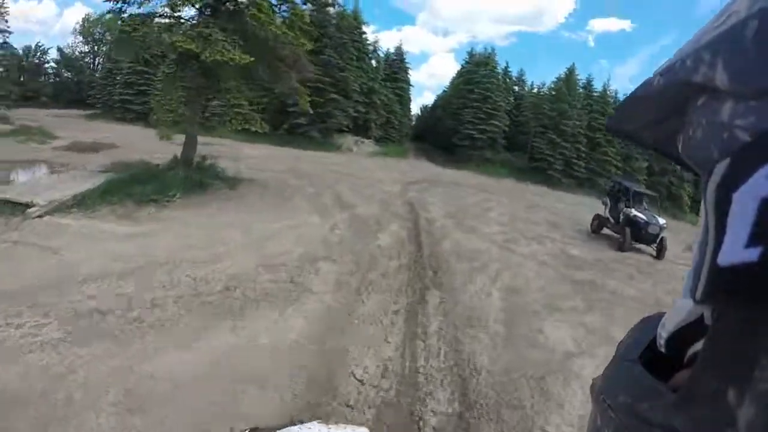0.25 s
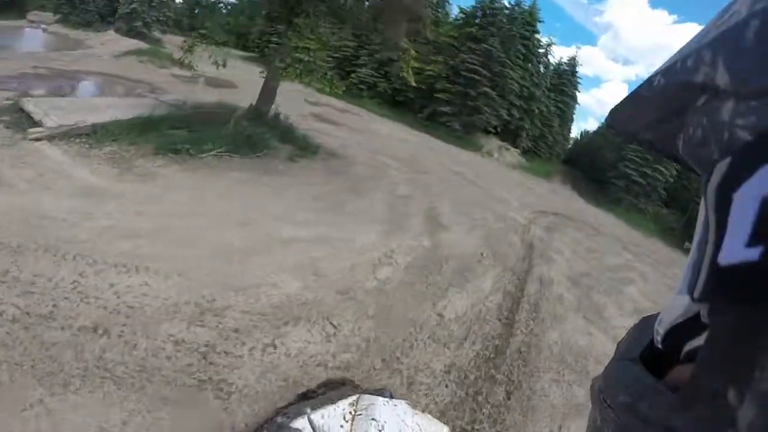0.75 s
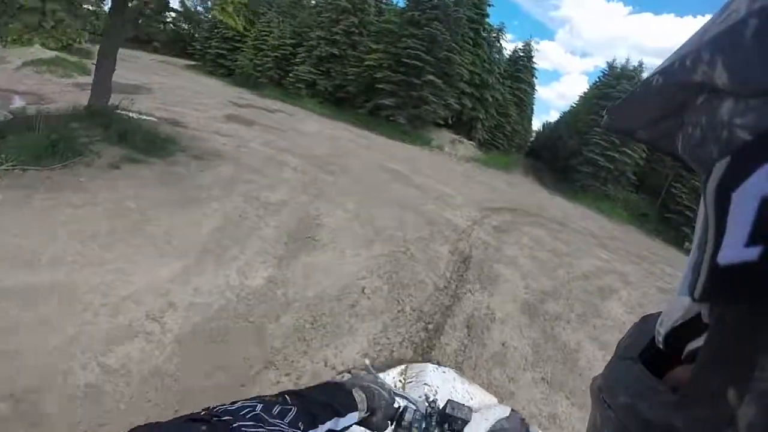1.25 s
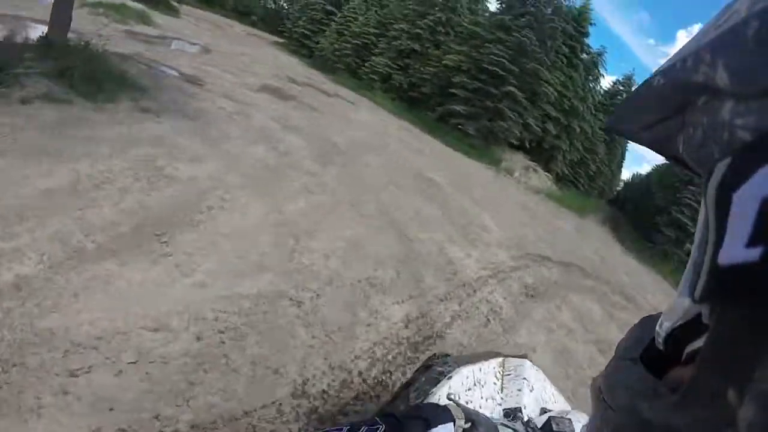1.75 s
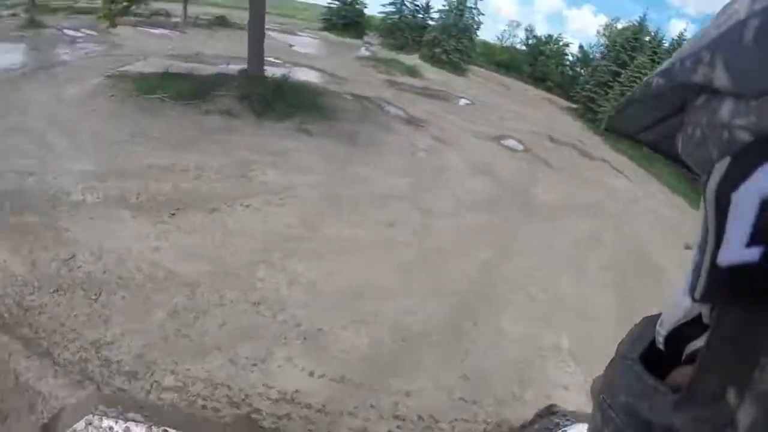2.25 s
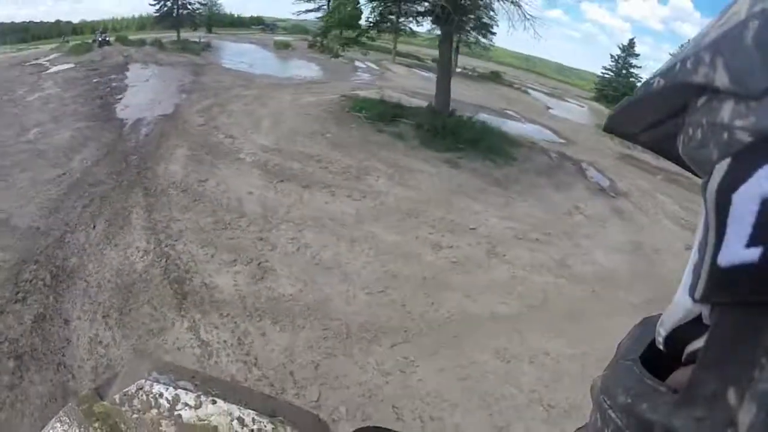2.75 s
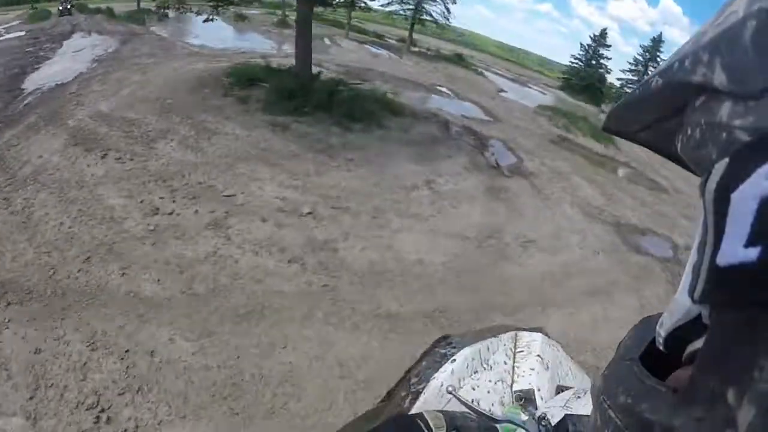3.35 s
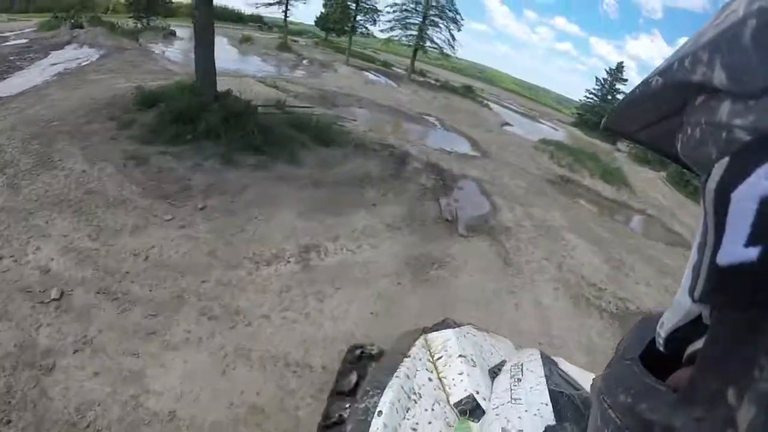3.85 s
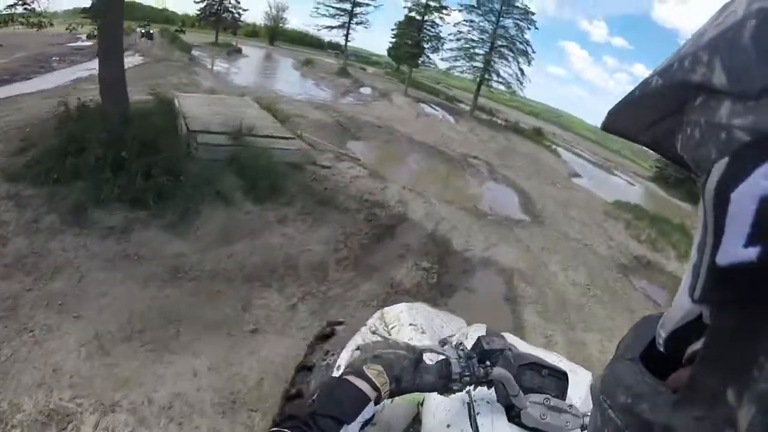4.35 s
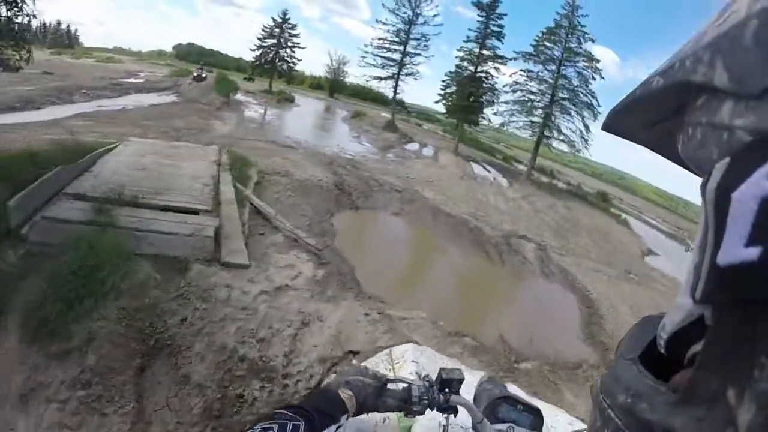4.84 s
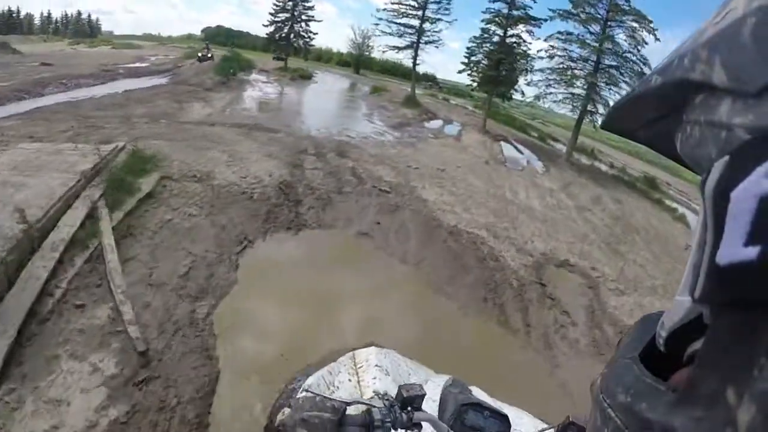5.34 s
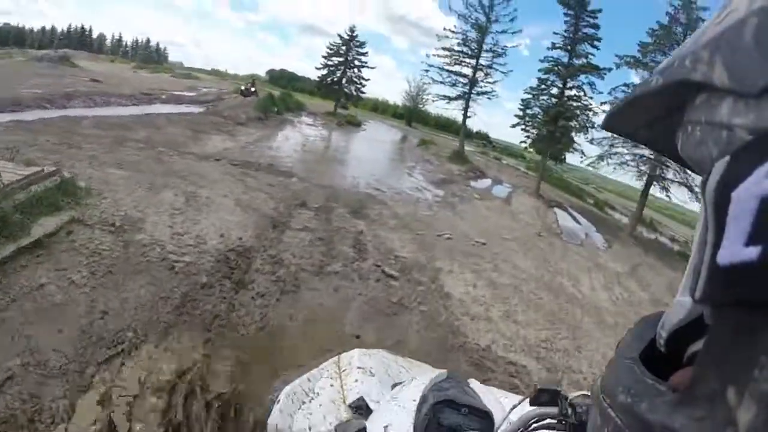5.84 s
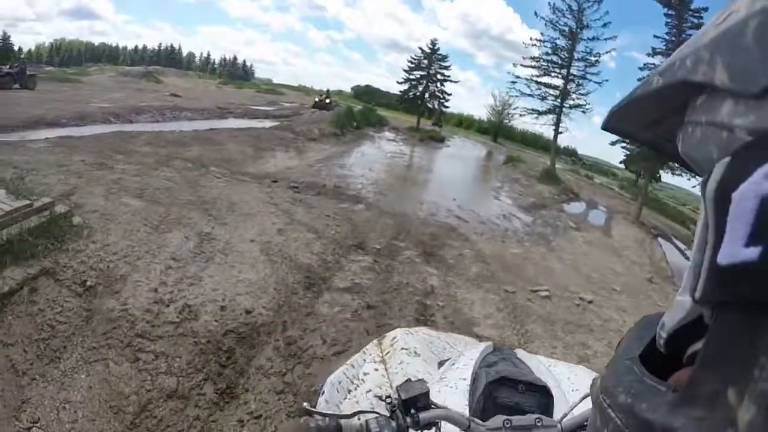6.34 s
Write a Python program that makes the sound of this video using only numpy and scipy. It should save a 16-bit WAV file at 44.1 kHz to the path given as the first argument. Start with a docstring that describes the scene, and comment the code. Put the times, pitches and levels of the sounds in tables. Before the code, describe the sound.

Outdoors on a dirt track, a microphone at the rider's helmet hears a single-cylinder four-stroke quad bike up close. It begins with a throaty, pulsing shut-throttle drone, mechanical clatter and soft hiss, slowing slightly. From about 0.8 to 1.6 seconds moderate blips roughen it, with thin gear whine. A brief sharp bark comes at 2.1, a small bright stone clink on metal at about 2.4, and stronger raspy bursts from 2.6 to 3.3. The longest pull, 3.4 to 3.9, climbs to the highest pitch with a ringing pipe, followed by a short blip near 4.1. From 4.3 to 5.6 braking shakes a loose panel in dense, hard rattles while the engine winds down. It chugs low and stumbles around 5.8 to 6.2, then blips at 6.3 and again at the end. Low wind buffets in lumps, strongest near 4.9 and 5.9.

```python
"""On a dirt track, a four-stroke quad bike is ridden with short throttle blips, heard at the rider's helmet.
Two blows per engine cycle ring silencer and pipe; under load they sharpen into a bark with a rasp of gas.
Crank-locked tones, gear whine and the filtered noise of engine clatter and hiss ride on the exhaust.
Random hits ring a loose panel under braking, a stone clinks on metal (decaying sines), and wind buffets
the microphone (lumpy low noise)."""
import sys
import numpy as np
from scipy import signal
from scipy.fft import rfft, irfft, next_fast_len
from scipy.io import wavfile
from scipy.ndimage import uniform_filter1d, map_coordinates

SR = 44100
rng = np.random.default_rng(int(sys.argv[2]) if len(sys.argv) > 2 else 0)


def waveform_to_disk(signal):
    """Save audio, clipped to [-1, 1], as 16-bit WAV at the path in sys.argv[1]."""
    frames = np.transpose(np.atleast_2d(signal))
    scaled = np.clip(frames, -1, 1) * 32767
    samples = np.round(scaled).astype(np.int16)
    wavfile.write(sys.argv[1], SR, samples)


N = 290619
TIME = np.arange(N) / SR

# engine cycle rate, one cycle = two crank turns: t/s, f/Hz
CYCLE_RATE = [(0.0, 41.87), (0.18, 38.89), (0.38, 37.38), (0.77, 35.9), (0.94, 38.29), (1.1, 39.26),
              (1.28, 42.11), (1.67, 41.42), (1.91, 38.17), (2.03, 37.48), (2.18, 39.19), (2.64, 36.95),
              (2.89, 44.4), (2.95, 44.61), (3.06, 41.44), (3.19, 41.4), (3.34, 45.93), (3.47, 45.08),
              (3.56, 46.82), (3.8, 55.21), (3.89, 55.8), (3.98, 49.61), (4.07, 48.37), (4.23, 50.0),
              (4.31, 48.48), (4.4, 42.93), (4.57, 37.2), (4.67, 35.5), (5.16, 32.5), (5.53, 28.1),
              (5.89, 27.2), (6.04, 31.13), (6.15, 27.84), (6.22, 28.53), (6.38, 35.75), (6.5, 32.94),
              (6.59, 36.79)]
# drone, throttle shut: t/s, boom level/dB, neck level/dB, order 3 level/dB, order 4 level/dB, order 6 level/dB
SHUT_DRONE = [(0.0, -38.5, -47, -59, -35.5, -36.5), (.4, -40, -40, -62, -44, -29),
              (.68, -32.5, -36, -46, -50, -26.5), (.78, -26.5, -28.5, -52, -57, -27.5),
              (1.4, -26.5, -35.5, -48, -43, -30), (1.75, -26.5, -33.5, -44, -39.5, -26),
              (2.1, -24, -28.5, -64, -44.5, -25), (2.4, -30, -32, -58, -36, -24.5),
              (2.62, -26, -28.5, -43, -35, -24), (3.05, -23.5, -31, -51, -32.5, -33.5),
              (3.45, -24, -28.5, -62, -37, -32.5), (3.7, -25.5, -38, -45, -30, -27),
              (3.85, -37, -35, -58, -59, -23.5), (3.97, -27, -37.5, -52, -49, -52),
              (4.06, -29, -39.5, -30, -47, -34), (4.25, -26.5, -36.5, -38.5, -27.5, -31),
              (4.6, -32, -36, -34, -34, -30), (5.05, -39, -36.5, -33, -35, -26),
              (5.6, -34.5, -42, -35, -45, -30.5), (5.95, -26, -39.5, -42, -58, -33),
              (6.3, -29.5, -34.5, -31.5, -70, -24.5), (6.59, -28.5, -39, -51, -52, -20.5)]


def amp(db):
    """dB to gain."""
    return 10 ** (np.asarray(db) / 20)


def unit(x):
    """Scale to rms 1."""
    return x / np.sqrt(np.mean(x ** 2) + 1e-20)


def curves(rows):
    """One value per sample for each column after the time."""
    s, *cols = np.transpose(rows)
    return [np.interp(TIME, s, c) for c in cols]


def wobble(rate_hz):
    """Smooth random curve, rate_hz knots a second."""
    knots = rng.standard_normal(int(N * rate_hz / SR) + 4)
    return map_coordinates(knots, [TIME * rate_hz])


def filtered(x, response):
    """x through a complex response of frequency."""
    m = next_fast_len(N + SR // 2)
    spectrum = rfft(x, m) * response(np.fft.rfftfreq(m, 1 / SR))
    return irfft(spectrum, m)[:N]


def modes(table, sign=-1):
    """Causal resonances; sign -1 alternates them, +1 starts them together in a sharp front."""
    def response(f):
        return sum(sign ** k * amp(db) * 1j * f * width / (hz * hz - f * f + 1j * f * width)
                   for k, (hz, width, db) in enumerate(table))
    return response


def noise(points):
    """Noise of rms 1 with a (f/Hz, level/dB) spectrum."""
    hz, db = np.transpose(points)
    shape = lambda f: amp(np.interp(np.log(f + 1), np.log(hz + 1), db))
    return unit(filtered(rng.standard_normal(N), shape))


def steady(x, cycles):
    """Even the running rms to 1; the window is cycles long at 40 cycles/s."""
    power = uniform_filter1d(x ** 2, int(cycles * SR / 40))
    return x / np.sqrt(np.abs(power) + 1e-12)


def crank():
    """Crank position in engine cycles: the integral of the cycle rate."""
    start_cycles = .185
    return start_cycles + np.cumsum(curves(CYCLE_RATE)[0]) / SR


def throttle():
    """Opening 0-1: each blip is a rising ramp times a closing ramp; at each moment the most open blip rules."""
    # throttle blips: start t/s, open t/s, let go t/s, opening/0-1
    blips = [(0.777, .95, 0.92, 0.11), (1.057, 1.21, 1.29, 0.55), (1.2, 1.358, 1.6, 0.44),
             (2.098, 2.18, 2.08, 0.9), (2.622, 2.69, 2.7, 0.6), (2.69, 2.81, 2.88, .74),
             (3.103, 3.221, 3.33, 0.89), (3.413, 3.517, 3.85, 0.96), (4.0, 4.038, 4.23, 0.82),
             (6.232, 6.332, 6.39, 0.64), (6.52, 6.575, 6.8, 0.65)]
    close_s = 0.087
    openings = []
    for start, full, shut, top in blips:
        rise = np.clip((TIME - start) / abs(full - start), 0, 1)
        fall = np.clip(1 - (TIME - shut) / close_s, 0, 1)
        openings.append(top * rise * fall)
    return np.max(openings, axis=0)


def firing():
    """Gain that sags at each weak firing."""
    # weak firings: t/s, level/dB, half length/s
    stumbles = [(0.713, -12, 0.0068), (1.697, -6, 0.0078), (2.207, -14.5, 0.0067), (2.631, -8, 0.0085),
                (5.016, -18, 0.0078), (5.777, -6, 0.015), (5.904, -8.5, 0.051), (6.054, -13, 0.031),
                (6.162, -11.5, 0.031), (6.46, -4, 0.031), (6.547, -24, .012)]
    return amp(sum(db * np.exp(-((TIME - s) / half) ** 2) for s, db, half in stumbles))


def blows(angle, lag_cycles, scatter_db, jitter_s):
    """One impulse per cycle at a crank position, a little uneven in size and time."""
    draw = rng.standard_normal((400, 2))
    turn = np.arange(1, int(angle[-1] - lag_cycles) + 1)
    at_s = np.interp(turn + lag_cycles, angle, TIME) + jitter_s * draw[turn, 0]
    index = np.clip(at_s * SR, 0, N - 1).astype(int)
    return np.bincount(index, amp(scatter_db * draw[turn, 1]), N)


def exhaust(angle):
    """Both blows ring the silencer; under load their steep fronts, the pipe's ring and gas rasp come out."""
    # main chamber mode: f/Hz, width/Hz, level/dB
    silencer = [(219, 95, -3)]
    # upper chamber modes: f/Hz, width/Hz, level/dB
    upper_chamber = [(401.3, 69.5, 14), (505, 55, -1.5), (659, 34, 2.5)]
    # tailpipe modes: f/Hz, width/Hz, level/dB
    tailpipe = [(785, 15, -1), (1130, 120, -3.5), (1360, 60, 2), (1586, 57, 0), (1830, 69, -2),
                (2306, 62, 1.5), (2750, 34, -32)]
    second_lag_cycles = .363  # about 260 crank degrees
    first_share = 0.19  # first blow reaches the silencer weaker and cuts its ring short
    boom_gain_db, neck_gain_db = 7, 12  # rise at full throttle
    bark_db, bark_gain_db = -57, 38  # shut; rise at full throttle
    # pipe ring: base; with load it rises above a cycle rate, up to a most
    ring_base_db, ring_from_hz, ring_db_per_hz, ring_most_db = -49, 47.5, 9.5, 29.5

    load = throttle()
    boom_db, neck_db = curves(SHUT_DRONE)[:2]
    over_hz = curves(CYCLE_RATE)[0] - ring_from_hz
    ring_db = ring_base_db + load * np.clip(ring_db_per_hz * over_hz, 0, ring_most_db)

    # the pipe rounds the fronts
    soft = lambda f: 1 / (1 + 1.3j * f / 2850 - (f / 2850) ** 2) ** 2
    first = filtered(blows(angle, 0, .6, .00002), soft)
    second = filtered(blows(angle, second_lag_cycles, .6, .00004), soft)

    # two chambers in a row: the ring swells, then fades
    boom = filtered(-second - first_share * first, lambda f: modes(silencer)(f) ** 2)
    neck = filtered(-first - 1.2 * second, lambda f: modes(upper_chamber, sign=1)(f) / (1 + 1j * f / 900))

    fronts = first + 0.68 * second
    echoes = fronts.copy()
    echoes[200:] += .3 * fronts[:-200]  # reflection inside the pipe, 4.5 ms later
    # the pipe's mouth passes little above its resonance
    mouth = lambda f: 1 / (1 + .75j * f / 1330 - (f / 1330) ** 2)
    bark = filtered(-echoes, lambda f: (1j * f / (300 + 1j * f)) ** 2 * mouth(f))

    # gas keeps rushing after each front, 6 ms decay
    jet = signal.lfilter([1], [1, -np.exp(-1 / (.006 * SR))], fronts)
    rasp = filtered(.013 * jet * rng.standard_normal(N), soft)
    ring = filtered(rasp - fronts, modes(tailpipe, sign=1))

    layers = [(boom, boom_db + boom_gain_db * load),
              (neck, neck_db + neck_gain_db * load),
              (bark, bark_db + bark_gain_db * load),
              (ring, ring_db)]
    return firing() * sum(amp(db) * steady(x, cycles=10) for x, db in layers)


def shaft(angle):
    """Sines locked to the engine cycle: 1 follows 2, 9 and 12 follow 3, 8 follows the boom."""
    second_db, second_gain_db = -37, 6.5  # shut; rise at full throttle
    fourth_gain_db = 6.5  # rise at full throttle
    eighth_db = -16  # relative to the shut-throttle boom
    boom_db, _, three_db, four_db, six_db = curves(SHUT_DRONE)
    load = throttle()

    def tone(order, lag_cycles):
        phase_cycles = order * (angle - lag_cycles + .0015 * wobble(25))
        return np.sqrt(2) * np.sin(2 * np.pi * phase_cycles)

    turns = tone(2, .1) + amp(-14) * tone(1, .1)
    third = tone(3, .12) + amp(-4) * tone(9, .12) + amp(-6) * tone(12, .12)
    fired = amp(three_db) * third
    fired = fired + amp(four_db + fourth_gain_db * load) * tone(4, 0.058)
    fired = fired + amp(six_db) * tone(6, 0.11)
    fired = fired + amp(boom_db + eighth_db) * tone(8, 0.086)
    return amp(second_db + second_gain_db * load) * turns + firing() * fired


def whine(angle):
    """Gear meshes sing thin, slightly unsteady tones at high orders of the engine cycle."""
    # gear whine, order 84: t/s, level/dB
    main_whine = [(0, -52), (.8, -64), (1.1, -51), (1.4, -63), (1.62, -50.5), (1.95, -55), (2.3, -45.5),
                  (2.5, -71), (2.9, -70), (3.02, -52), (3.2, -47), (3.35, -75), (6.59, -75)]
    # brief whines: middle t/s, half length/s, order, level/dB
    brief_whines = [(1.398, 0.17, 73, -44), (2.25, 0.082, 77, -49), (2.84, .08, 69, -54)]

    def mesh(order):
        phase_cycles = order * angle + .05 * wobble(40)
        return np.sqrt(2) * np.sin(2 * np.pi * phase_cycles) * amp(2.5 * wobble(12))

    brief = sum(amp(db) * np.exp(-((TIME - s) / half) ** 2) * mesh(order)
                for s, half, order, db in brief_whines)
    return amp(curves(main_whine)[0]) * mesh(order=84) + brief


def clatter(angle):
    """Valve gear, chain and tyres: casing noise beating with the crank, a broad base and a bright hiss."""
    # engine casing modes: f/Hz, width/Hz, level/dB
    casing_modes = [(1120, 68, 6), (1427, 37, 7), (1743, 110, 2.5), (2294, 30, 4.5), (2740, 610, 3),
                    (3490, 320, -2), (4160, 140, -11.5), (5970, 650, -10.5), (6940, 210, -12)]
    # spectrum of the broad base: f/Hz, level/dB per Hz
    base_spectrum = [(30, -33), (70, -9.5), (130, -14.5), (230, -10.5), (330, -18), (600, -21.5),
                     (900, -22.5), (2000, -23), (4000, -35.5), (6000, -120)]
    # spectrum of the hiss: f/Hz, level/dB per Hz
    hiss_spectrum = [(2350, -25), (4000, -1.5), (4350, 4), (4860, -13), (5300, -7.5), (5800, 0.5),
                     (6300, -7), (7150, -4.5), (7820, -7), (8590, -6.5), (9280, -15), (10400, -11),
                     (11500, -19), (13200, -13.5), (15000, -28.5)]
    # slow levels: t/s, clatter offset level/dB, hiss level/dB
    slow_levels = [(0, 2, -47.5), (.73, -2.5, -54), (1.1, -1.5, -58), (1.4, 0, -55), (1.9, 0.5, -54.5),
                   (2.6, -1.5, -58), (3.1, 1, -54.5), (3.55, 2.5, -51), (3.9, 1.5, -55.5),
                   (4.6, 5.5, -48.5), (5.2, 1.5, -55.5), (6.13, 3.5, -43), (6.35, 3, -50.5), (6.59, 1, -52)]
    # shut at 40 cycles/s; rise at full throttle; rise with cycle rate
    shut_db, clatter_gain_db, clatter_db_per_hz = -41.5, 5, 0.1552
    base_db, hiss_gain_db = 5, 8.5  # over the casing; rise at full throttle

    load = throttle()
    slow_db, hiss_db = curves(slow_levels)
    rate_db = clatter_db_per_hz * (curves(CYCLE_RATE)[0] - 40)
    clatter_db = shut_db + slow_db + clatter_gain_db * load + rate_db

    beat_db = 0.24 * np.cos(4 * np.pi * angle) + 0.88 * np.cos(2 * np.pi * angle) + 0.7 * wobble(40)
    ticks = rng.standard_normal(N) * amp(1.3 * wobble(900))
    casing = unit(filtered(amp(beat_db) * ticks, lambda f: modes(casing_modes)(f) / (1 + 1j * f / 9000) ** 2))
    hiss = noise(hiss_spectrum) * unit(amp(0.87 * wobble(30) + 1.4 * wobble(300)))
    bed = casing + amp(base_db) * noise(base_spectrum)
    return amp(clatter_db) * bed + amp(hiss_db + hiss_gain_db * load) * hiss


def rattle():
    """Random hits ring a loose panel in dense clumps under braking; hard knocks start decaying bursts."""
    # hard knocks: t/s, peak drive level/dB, t60/s
    knocks = [(4.3295, -25, 0.063), (4.362, -23, 0.15), (4.5776, -26, 0.074), (4.628, -30, .04),
              (4.662, -22, 0.19), (4.6904, -21.5, 0.1), (4.756, -20, 0.055), (4.8162, -42, 0.044),
              (4.842, -23.5, 0.075), (4.888, -28, .03), (4.9443, -25, .05), (5.098, -21, 0.13),
              (5.3215, -33.5, 0.29), (5.4203, -31, 0.11), (5.5016, -23, 0.064), (5.546, -25, 0.072),
              (5.587, -29, .05)]
    # panel modes: f/Hz, width/Hz, level/dB
    panel = [(1100, 23, -16), (1690, 280, 10), (3380, 480, 3.5), (4510, 230, -3.5), (5120, 160, -10.5),
             (5550, 86, -5.5), (7140, 150, -18)]
    start_s, hardest_s, end_s = 4.32, 4.594, 5.58  # braking
    hardest_db, edge_db, edge_s = -27.5, -39.5, 0.086  # chatter; its rise and fall time

    on = np.clip(np.minimum(TIME - start_s, end_s + edge_s - TIME) / edge_s, 0, 1)
    level_db = np.interp(TIME, (start_s, hardest_s, end_s), (edge_db, hardest_db, edge_db))
    draw = rng.random((2, N))
    struck = draw[0] < 2200 / SR  # 2200 hits a second on average
    hits = struck * amp(-2.4 * np.log(draw[1])) * np.sign(draw[1] - .4)
    drive = on * amp(level_db + 1.9 * wobble(120) + 2.5 * wobble(20))
    for s, db, t60 in knocks:
        drive += (TIME >= s) * amp(db - 60 * np.abs(TIME - s) / t60)
    ring = lambda f: modes(panel)(f) / (1 + 1j * f / 8000) ** 2
    return filtered(drive * hits, ring) / np.std(filtered(hits, ring))


def clink():
    """A stone hits metal: a short bright noise crack and thin decaying sines."""
    # stone hits: t/s, level/dB before a 7 dB cut
    stone_hits = [(2.357, -31.5)]
    # metal partials: f/Hz, level/dB, t60/s
    metal = [(3510, -1, 0.23), (7650, -7, .04), (10510, -6, .06), (11430, -10, .05), (13300, -17, .12),
             (14400, -23, .1)]
    out = np.zeros(N + SR)
    t = np.arange(SR // 4) / SR
    for s, db in stone_hits:
        ring = sum(amp(level - 60 * t / t60) * np.sin(2 * np.pi * hz * t) for hz, level, t60 in metal)
        crack = .7 * amp(-60 * t / 0.036) * np.diff(rng.standard_normal(len(t) + 1))
        out[round(s * SR):][:len(t)] += amp(db - 7) * (ring + crack)
    return out[:N]


def wind():
    """Wind on the microphone: low noise with a lumpy random gain."""
    # wind: t/s, level/dB
    wind_level = [(0.0, -42), (.62, -38), (.83, -38), (1.96, -45), (2.3, -38), (2.39, -30), (2.55, -34),
                  (3.65, -33), (3.82, -45), (4.88, -29), (5.2, -35.5), (5.9, -27.5), (6.17, -58),
                  (6.59, -49)]
    # buffet spectrum: f/Hz, level/dB per Hz
    buffet_spectrum = [(5, -15), (12, 0.5), (22, -3), (40, -13), (60, -24), (120, -17), (300, -120)]
    lumps = amp(0.58 * wobble(12) + 1.7 * wobble(5.37))
    return amp(curves(wind_level)[0]) * unit(lumps * noise(buffet_spectrum))


def scene():
    """Sum of all sources at the microphone, in the open air."""
    angle = crank()
    engine = exhaust(angle) + shaft(angle) + whine(angle) + clatter(angle)
    return (engine + rattle() + clink() + wind())[None]


def record(dry):
    """The case cuts dips, the microphone drops the deepest bass and dulls the top; then the band limit."""
    # dips of the microphone's case: f/Hz, width/Hz, depth/0-1
    case_dips = [(1483, 150, 0.94), (2057, 576, 0.68), (4020, 300, 0.5)]
    top_hz = 15170

    def colour(f):
        dips = np.prod([1 - np.clip(depth, 0, .95) * 1j * f * width / (hz * hz - f * f + 1j * f * width)
                        for hz, width, depth in case_dips], axis=0)
        bass = 1j * f / (6 + 1j * f)
        treble = 1 / np.sqrt(1 + (f / 14500) ** 16)
        return dips * bass * treble * (f < top_hz)

    return filtered(dry[0], colour)[None]


dry = scene()
out = record(dry)
waveform_to_disk(out)
```